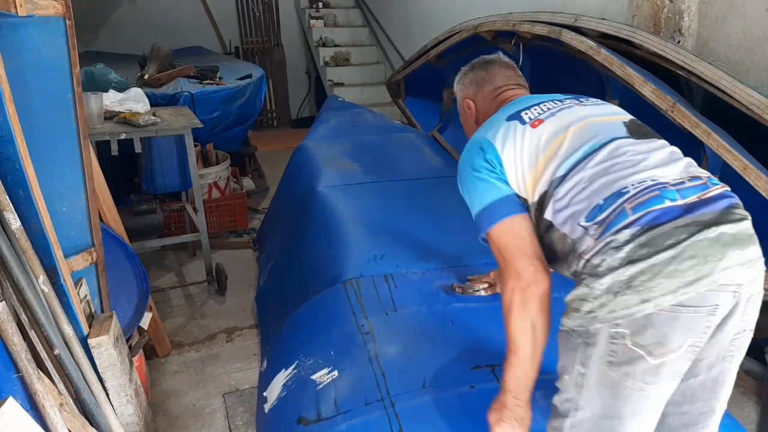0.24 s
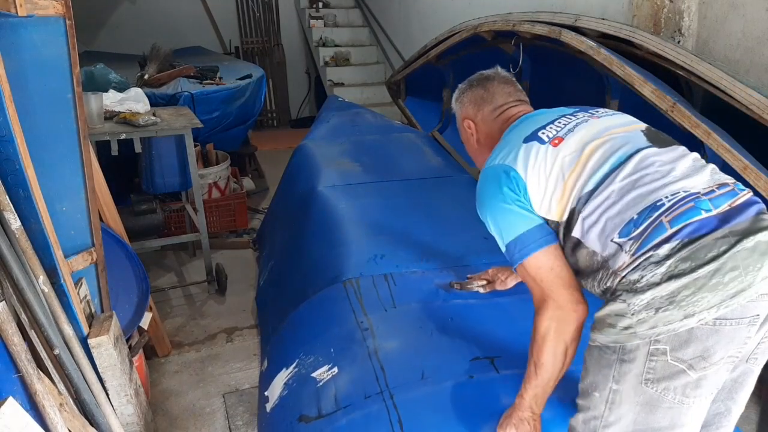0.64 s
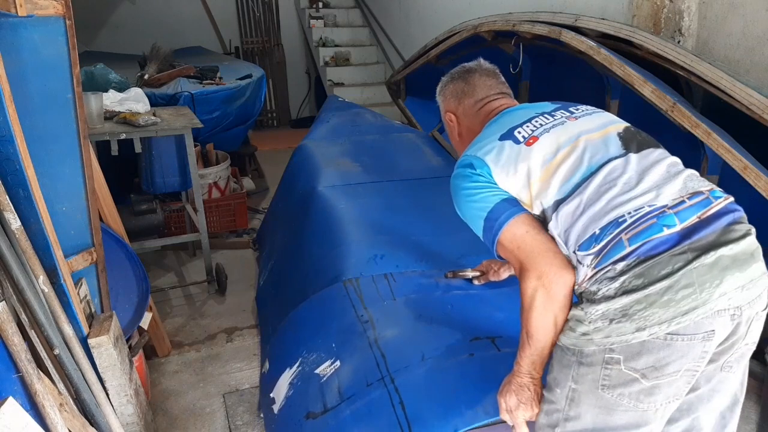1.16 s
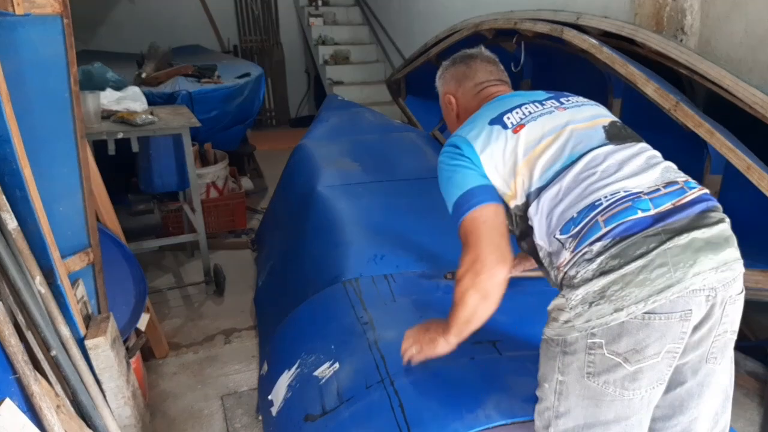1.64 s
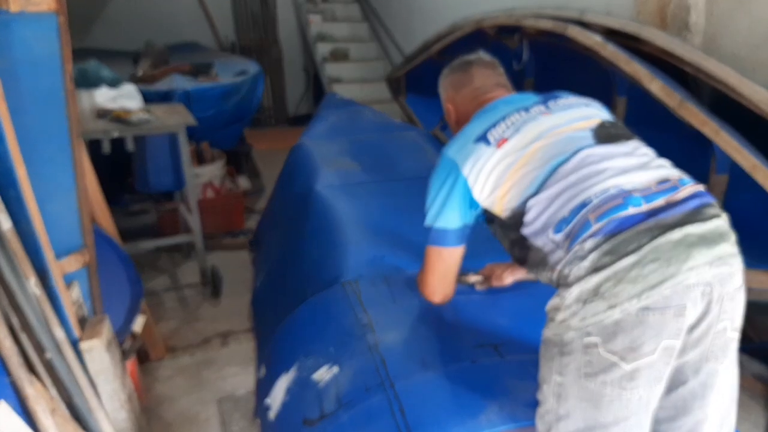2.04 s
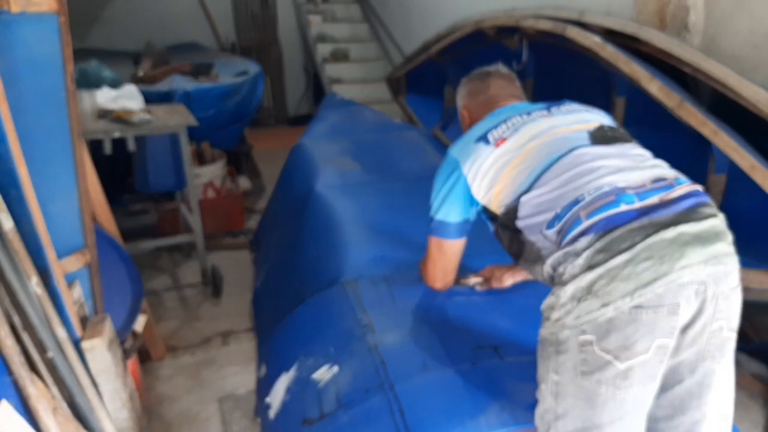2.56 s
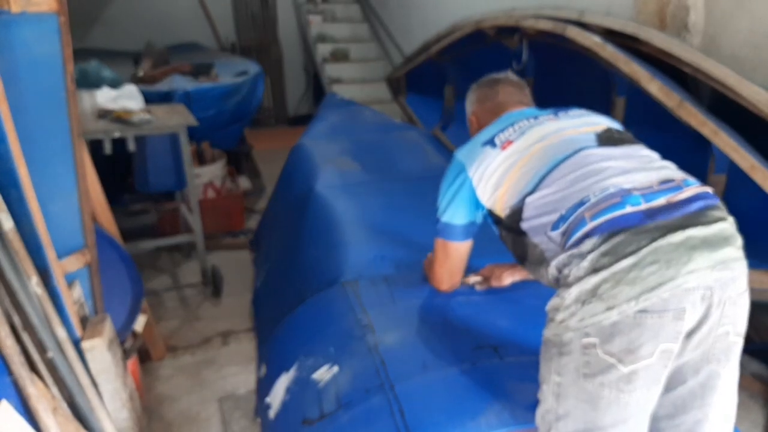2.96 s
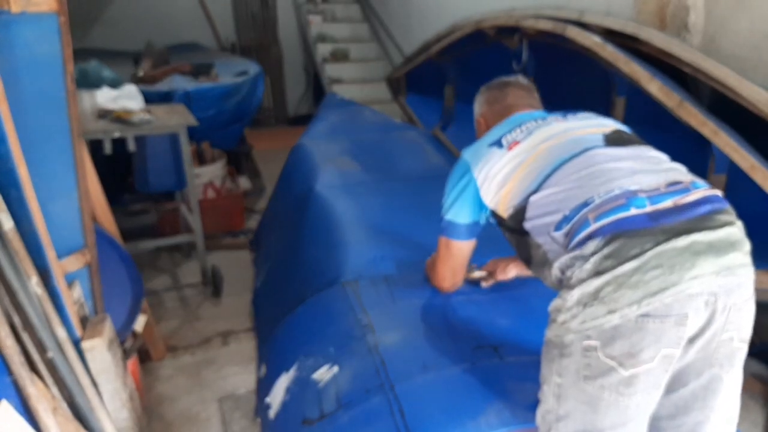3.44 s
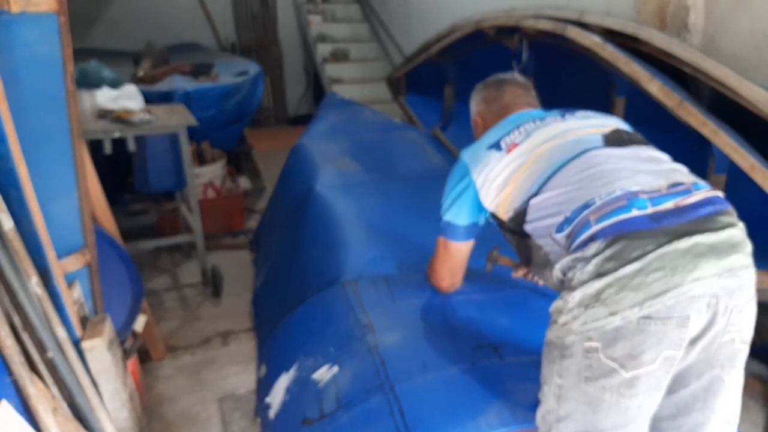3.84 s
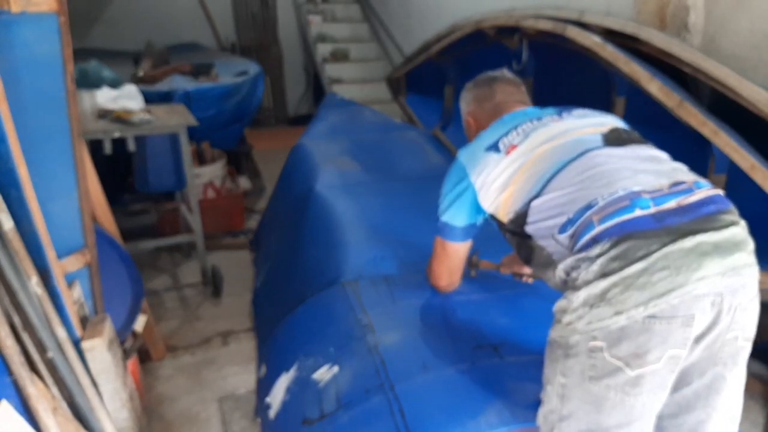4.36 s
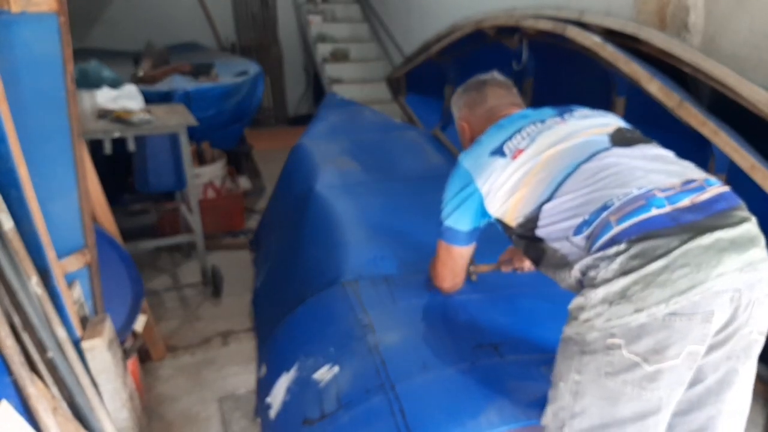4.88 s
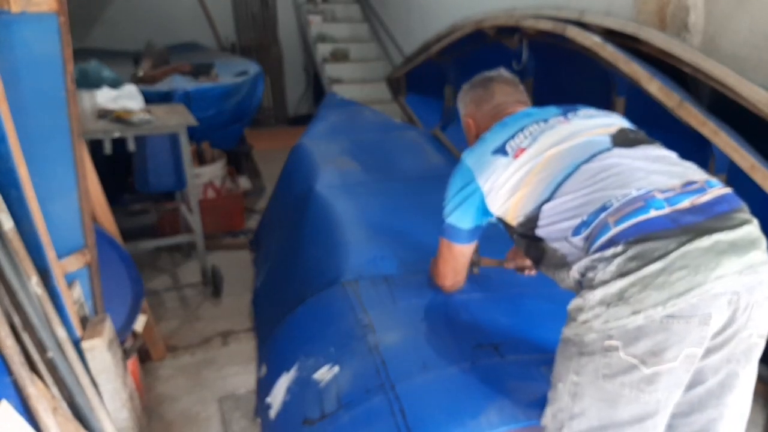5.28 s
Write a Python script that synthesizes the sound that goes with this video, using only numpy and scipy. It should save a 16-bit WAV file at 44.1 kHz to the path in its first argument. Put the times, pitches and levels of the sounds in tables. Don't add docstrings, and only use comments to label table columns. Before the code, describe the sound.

In an open concrete workshop, hands scuff and shove a large hollow plastic hull with soft low thumps. A deep thud and a few isolated knocks follow, with quiet gaps where distant birds and one cockerel crow are heard. Two light starting taps lead into three loud, evenly spaced hammer blows that crack and boom. Handheld stereo microphone a few metres away, the hull slightly left.

```python
import sys
import numpy as np
from scipy import signal
from scipy.fft import rfft, irfft
from scipy.io import wavfile
from scipy.ndimage import uniform_filter1d

SR = 44100
rng = np.random.default_rng(int(sys.argv[2]) if len(sys.argv) > 2 else 0)


def how_loud(loudness_db):
    steps = np.asarray(loudness_db, float) / 20
    return 10 ** steps


def to_wav(sig):
    pcm = np.clip(np.atleast_2d(sig), -1, 1) * 32767
    pcm = np.round(pcm).astype(np.int16)
    wavfile.write(sys.argv[1], SR, pcm.T)


N = 242991
T = np.arange(N) / SR

# frequency in Hz, level in dB per Hz.
YARD_COLOUR = [(15, -11), (25, 10), (92, 2.5), (245, -9.5), (389, -3), (510, -7), (687, -7.5), (787, -10),
               (1060, -20), (1390, -18), (2980, -19.5), (4480, -21), (7510, -22.5), (14800, -44.5),
               (16500, -28)]
# time in seconds, level in dB.
TWITTER_SWELL = [
    (2.9, -75),
    (3.2, -64),
    (3.55, -60),
    (3.75, -64),
    (4.0, -66),
    (4.4, -70),
]
# start in seconds, length in seconds, start pitch in Hz, end pitch in Hz, level in dB.
BIRD_NOTES = [(1.29, .2, 3300, 2180, -67), (2.27, .38, 3250, 2270, -66), (1.6, .04, 4500, 3400, -60),
              (1.6, .03, 5300, 4700, -64), (1.635, .085, 3950, 3850, -68), (4.1, .05, 4300, 3500, -62),
              (4.05, .2, 3900, 3850, -73), (2.515, .03, 6300, 6250, -64), (2.9, .07, 2700, 2650, -66),
              (1.85, .17, 2050, 2000, -67), (1.95, .04, 6300, 6250, -75), (1.54, .06, 2200, 2700, -68),
              (4.115, .02, 5200, 4600, -64)]
# time in seconds, pitch in Hz, level in dB.
CROW = [
    (2.1, 540, -30),
    (2.2, 555, 0),
    (2.35, 560, 1),
    (2.48, 565, 1),
    (2.62, 565, -5),
    (2.75, 560, -30),
]
CROW_HARMONICS_DB = [-1.5, -21, -22, -22]
# start in seconds, rise in seconds, hold in seconds,
# scuff level in dB, thin airy layer in dB relative to the scuff.
SCUFFS = [(-0.03, 0.015, 0.067, -51.5, -7.5), (0.057, 0.0027, 0.01, -44.5, -11), (0.15, 0.09, .08, -66, 1),
          (0.29, 0.069, .03, -50, -22), (0.49, .03, 0.064, -42, -8), (0.53, .09, 0.035, -39.5, -10),
          (0.753, .004, 0.012, -46.5, 0), (0.94, 0.062, 0.062, -44.5, -12.5),
          (1.25, 0.017, 0.058, -70.5, 4.5), (1.739, .005, .006, -51.5, -1), (1.77, 0.06, 0.059, -65, 10),
          (2.12, 0.19, 0.012, -67, -5), (2.775, .03, 0.094, -61.5, -21), (3.228, 0.005, 0.013, -59.5, -3),
          (3.67, .01, 0.037, -69.5, -31), (4.335, 0.015, .085, -52, -19)]
# frequency in Hz, level in dB per Hz.
SCUFF_COLOUR = [(410, -26), (700, 2), (1180, -4.5), (1350, -3), (2400, -2.5), (6280, -12), (7640, -11),
                (9500, -51), (12400, -51.5), (20900, -120)]
# frequency in Hz, level in dB per Hz.
AIR_COLOUR = [(4710, -15), (8000, -5.5), (10500, -5), (12500, 1.5), (15200, -6), (16300, -12), (16500, -50)]
# start in seconds, rise in seconds, hold in seconds, # rumble level in dB, boom in dB relative to the
DRAGS = [(-0.03, 0.01, 0.019, -42, 5), (0.07, 0.012, 0.23, -74, 21.5), (0.36, 0.011, 0.03, -36.5, -0.5),
         (0.42, 0.052, 0.032, -46, 15), (0.51, 0.0078, 0.059, -38.5, -4), (0.58, 0.017, 0.097, -62, 27.5),
         (0.68, 0.078, 0.011, -11.5, -39), (0.79, 0.054, 0.0066, -9, -50),
         (0.93, 0.035, 0.076, -44.5, 12.5), (1.3, .1, 0.25, -84, 22), (1.55, 0.023, 0.085, -81, 13.5),
         (1.75, 0.021, 0.12, -76.5, 25), (2.77, .04, 0.035, -54.5, -7), (2.92, 0.032, 0.011, -53, 2),
         (3.2, 0.11, 0.14, -54, 1), (4.42, 0.0064, 0.02, -33.5, -13), (4.5, 0.013, 0.042, -69, 26.5)]
# frequency in Hz, level in dB, t60 in seconds.
HULL_MODES = [(92.9, 3.5, 0.52), (112.65, 4, 0.69), (145, 0.5, 0.65), (170, -16, 1), (220.2, -5.5, 0.67),
              (271.5, -6, 0.12), (317.2, 1, 0.3), (354, -1, 0.42), (385, -7.5, 0.42), (420.4, -17, 0.55),
              (436.4, 2, .25), (486.6, -8.5, 0.49), (495.5, -11.5, 0.26), (604.6, -12.5, 0.15),
              (677, -6, 0.3), (793, -13.5, 0.1)]
# centre in Hz, level in dB, rise in milliseconds, t60 in seconds.
SCATTER = [(98.6, -6.5, 23, 0.81), (158, -11.5, 17, 0.89), (290, -5.5, 9.7, 0.58), (587, -8.5, 6.74, 0.52),
           (1093, -12, 4, 0.65), (2224, -12, 2.2, 0.65), (4614, -12, 1.1, 0.55), (6920, -3.5, 1.2, 0.22),
           (13500, -15.5, 1.4, 0.18)]
# start in seconds, knock level in dB, what meets the hull.
BLOWS = [(0.316, -42.5, "palm"), (0.516, -39, "palm"), (0.696, -29, "shove"), (0.754, -19, "shove"),
         (1.075, -25, "rib"), (1.727, -39, "tap"), (2.689, -67.5, "tick"), (2.855, -53, "tick"),
         (2.967, -27, "shaft"), (3.373, -22, "tap"), (4.312, -35.5, "start"), (4.41, -33.5, "start"),
         (4.7076, -17, "drive"), (4.92, -15, "drive"), (5.1252, -17, "drive")]
BLOW_TONE_HZ = [120, 330, 850, 2100, 7000]
CONTACT_TONE = {"palm": (10, -1, -7, -21), "shove": (2.5, 9, -10, -28), "rib": (8.5, 9, -19, -49.5),
                "tap": (-15.5, -3.5, -1, -13), "tick": (-4.5, -7, 7, -12.5), "shaft": (-4, -6, -11, -23),
                "start": (0, 5.5, -4.5, -25.5), "drive": (2.5, 8, -6.5, -17.5)}
CONTACT_BITE = {"palm": (-22, .8), "shove": (-22, .9), "rib": (-14, 1.1), "tap": (-7, 1.05),
                "tick": (-4, 2), "shaft": (-9, 1.28), "start": (-6, .95), "drive": (0, .78)}
# frequency in Hz, left minus right in dB.
LEFT_TILT = [(200, 5), (700, 1.5), (2500, 2), (5000, 4.5), (9000, -0.5), (14000, -2.5)]


def unit(x):
    return x / np.sqrt(np.mean(x ** 2))


def shape(x, hz, db):
    f = np.maximum(np.fft.rfftfreq(x.shape[-1], 1 / SR), 1)
    return irfft(rfft(x) * how_loud(np.interp(np.log(f), np.log(hz), db)), x.shape[-1])


def pair(size):
    alike_hz = 780
    mid, side = rng.standard_normal((2, size))
    side = shape(side, [alike_hz / 6, alike_hz * 2], [-16, 0])
    return np.array([mid + side, mid - side])


def walk(rate):
    k = int(SR / rate)
    held = np.repeat(rng.standard_normal(N // k + 1), k)
    return uniform_filter1d(uniform_filter1d(held, k), k)[:N]


def decay(t, t60):
    return np.exp(-np.log(1000) * t / t60)


def strokes(rows, release_db_s):
    s, rise, hold, db, second_db = np.array(rows).T[:, :, None]
    swell = np.clip((T - s) / np.maximum(rise, 1e-3), 0, 1) ** 2
    gain = swell * how_loud(db - release_db_s * np.maximum(T - s - rise - hold, 0))
    return gain.sum(axis=0), (gain * how_loud(second_db)).sum(axis=0)


def yard():
    hum_db, hiss_db = -60.5, -82
    hum = unit(shape(pair(N), *np.transpose(YARD_COLOUR))) * how_loud(hum_db + 2.0 * walk(2.7))
    twitter = shape(pair(N), [1455, 2500, 3190, 4000, 4607, 5540], [-16.5, -6, -0.5, -6, -2, -23.5])
    twitter = unit(twitter * how_loud(3 * walk(30)))
    twitter *= how_loud(np.interp(T, *np.transpose(TWITTER_SWELL), -120, -120))
    hiss = how_loud(hiss_db) * shape(rng.standard_normal((2, N)), [6000, 12000], [-20, 0])
    return hum + hiss + twitter


def bird_notes():
    glide_s, hoarse_above_hz, hoarse_rate_hz = .09, 3350, 500
    out, waver = np.zeros(N), 1 + .012 * walk(70)
    for s, length, from_hz, to_hz, db in BIRD_NOTES:
        u = np.clip((T - s) / length, 0, 1)
        slide = np.clip(1 - u * length / min(length, glide_s), 0, 1)
        hz = to_hz + (from_hz - to_hz) * slide
        rasp = 1.5 * walk(hoarse_rate_hz) if from_hz > hoarse_above_hz else 1
        swell = np.clip(np.minimum(u * 20, 4 - 4 * u), 0, 1)
        out += how_loud(db) * rasp * swell * np.sin(2 * np.pi * np.cumsum(hz * waver) / SR)
    return out * how_loud(4 * walk(120))


def cockerel():
    s, hz, db = np.transpose(CROW)
    phase = 2 * np.pi * np.cumsum(np.interp(T, s, hz) * (1 + 0.03 * walk(60))) / SR
    voice = sum(how_loud(p) * np.sin((k + 1) * phase) for k, p in enumerate(CROW_HARMONICS_DB))
    level_db = -61 + np.interp(T, s, db) + 8.2 * walk(56)
    return voice * how_loud(level_db) * (T > s[0]) * (T < s[-1])


def birds():
    calls = bird_notes() + cockerel()
    t = np.arange(SR // 2) / SR
    echo = rng.standard_normal((2, len(t))) * decay(t, .4) * how_loud(-34)
    echo[:, 0] = .6
    return signal.fftconvolve(calls[None], echo, axes=1)[:, :N]


def scuff():
    grit = pair(N) * how_loud(1.5 * walk(56.83) + 2.5 * rng.exponential(size=N))
    rub_gain, air_gain = strokes(SCUFFS, release_db_s=142)
    rub = unit(shape(grit, *np.transpose(SCUFF_COLOUR)))
    air = unit(shape(grit, *np.transpose(AIR_COLOUR)))
    return rub * rub_gain + air * air_gain


def ring(t, chance, scatter_db, detune, swell_ms):
    hz, db, t60 = np.array(HULL_MODES).T[:, :, None]
    pitch_chance, phase_chance, level_chance, port_chance = chance
    phase = 2 * np.pi * hz * (1 + detune * pitch_chance) * t + 0.2 * phase_chance
    fade = decay(t, np.clip(t60, .05, 1)) * (1 - np.exp(-t * 1000 / swell_ms))
    size = how_loud(db + scatter_db * level_chance) * fade
    turn = np.array([1, -1])[:, None, None] * np.clip(hz / 1000, 0, 1) ** 3 * port_chance
    return (size * np.sin(phase + turn)).sum(axis=1)


def drag():
    slips = rng.standard_normal((2, N)) * (rng.random(N) < 150 / SR)
    slips = slips[0] + 0.18 * slips + 0.024 * pair(N)
    t = np.arange(SR // 10) / SR
    chance = rng.standard_normal((4, len(HULL_MODES), 1))
    hull = ring(t, chance, scatter_db=2.0, detune=0, swell_ms=0.67) * np.exp(-t / 0.028)
    shaken = signal.fftconvolve(slips, hull, axes=1)[:, :N] + how_loud(-12) * pair(N)
    shaken = shaken / uniform_filter1d(np.abs(shaken).mean(axis=0), SR // 8)
    rumble = unit(shape(shaken, [150, 200, 500, 650, 1100, 2500], [-11.5, 11.5, 3.5, -3, 3.0, -39.5]))
    boom = unit(shape(shaken, [43.03, 77.4, 161, 220], [-1.0, -3.0, 0.5, -8.0]))
    rumble_gain, boom_gain = strokes(DRAGS, release_db_s=259)
    return rumble * rumble_gain + boom * boom_gain


def scatter(t, linger):
    out, noise = np.zeros((2, len(t))), pair(len(t))
    near = 1 + 1.93 * np.exp(-t / 0.058)
    for hz, db, rise_ms, t60 in SCATTER:
        corners = [hz / 8, hz / 2, hz, hz * 2, hz * 8]
        band = unit(shape(noise, corners, [-57.5, -25, -9, -27.5, -53])) * near
        rise = 1 - np.exp(-t * 1000 / rise_ms)
        out += how_loud(db - 7.0) * band * rise * decay(t, t60 * linger)
    return out


def crack(t, hard_db):
    echo = np.maximum(t - .0022, 0)
    burst = 0.49 * np.exp(-t / .0005) + 0.99 * (echo > 0) * np.exp(-echo / 0.0026)
    return how_loud(12 + hard_db) * shape(pair(len(t)), [5000, 14000], [0, -8]) * burst


def skin_jump(t, hard_db):
    jump_s, floor_echo_s = .00012, .0013
    out = np.zeros(len(t))
    for late_s in (0, floor_echo_s):
        u = np.maximum(t - late_s - 2 * jump_s, 0) / jump_s
        out -= how_loud(18.5 + hard_db) * u * np.exp(-u)
    return out


def panel(t, hard_db):
    panel_hz, panel_db, late_s, swell_s, t60_s = 322, 11, .0017, .004, .13
    u = np.maximum(t - late_s, 0)
    swell = 1 - .5 * np.exp(-u / swell_s)
    return how_loud(panel_db + 2 * hard_db) * np.sin(2 * np.pi * panel_hz * u) * swell * decay(u, t60_s)


def blows():
    out, t = np.zeros((2, N + SR)), np.arange(SR) / SR
    spots = rng.standard_normal((len(BLOWS), 4, len(HULL_MODES), 1))
    spots[-3, 2] = 0
    spots[-3, 3] *= .3
    spots[-2:] = spots[-3]
    for (s, knock_db, kind), spot in zip(BLOWS, spots):
        boom_db, body_db, *top_db = CONTACT_TONE[kind]
        hard_db, linger = CONTACT_BITE[kind]
        if kind == "rib":
            spot[2] = np.linspace(-.5, .5, len(HULL_MODES))[:, None]
            spot[:, -1, 0] = 0, 0, 5.8, 0
        body = how_loud(-5) * ring(t, spot, scatter_db=6.0, detune=0.0093, swell_ms=7.5)
        body += scatter(t, linger) + crack(t, hard_db)
        body = shape(body, BLOW_TONE_HZ, [boom_db, body_db, 0, *top_db])
        body += skin_jump(t, hard_db) + panel(t, hard_db)
        body *= np.clip(t / .0002, 0, 1) * np.clip(2 - t / .4, 0, 1)
        start = int(s * SR)
        out[:, start:start + SR] += how_loud(knock_db) * body
    return out[:, :N]


def scene():
    near = scuff() + drag() + blows()
    hz, db = np.transpose(LEFT_TILT)
    left = shape(near[0], hz, db / 2)
    right = shape(np.roll(near[1], 16), hz, -db / 2)
    return yard() + birds() + np.array([left, right])


def roll_off(x):
    return signal.sosfilt(signal.butter(12, 16820, fs=SR, output="sos"), x)


def record(dry):
    bass_cut = signal.butter(4, 64, "high", fs=SR, output="sos")
    top_cut = signal.ellip(8, .2, 60, 16000, fs=SR, output="sos")
    rounded = np.tanh(0.9 * signal.sosfilt(bass_cut, dry)) / 0.97
    return roll_off(signal.sosfilt(top_cut, rounded))


dry = scene()
out = record(dry)
to_wav(out)
```